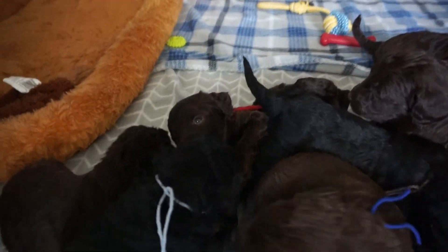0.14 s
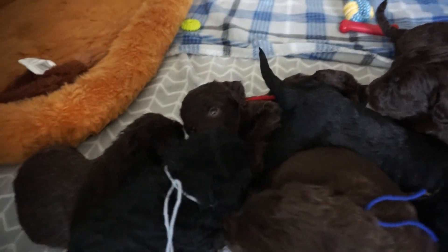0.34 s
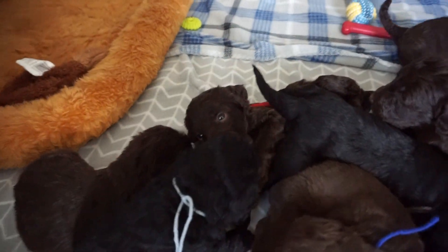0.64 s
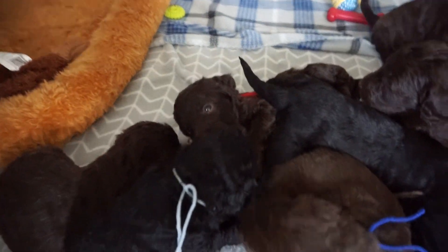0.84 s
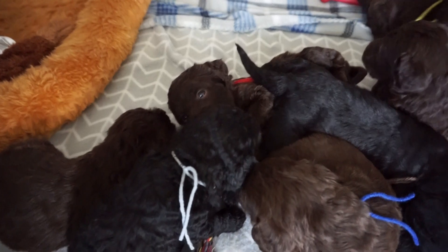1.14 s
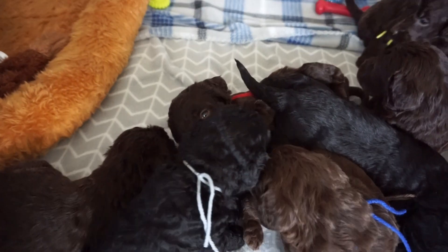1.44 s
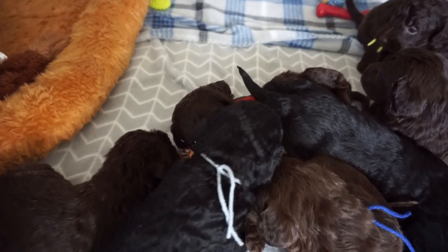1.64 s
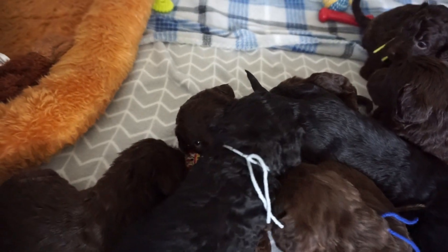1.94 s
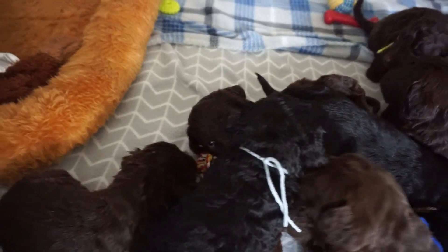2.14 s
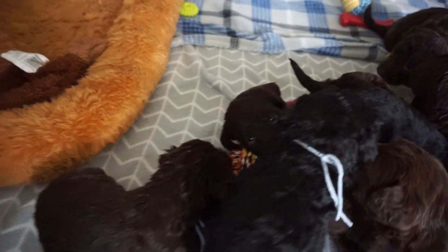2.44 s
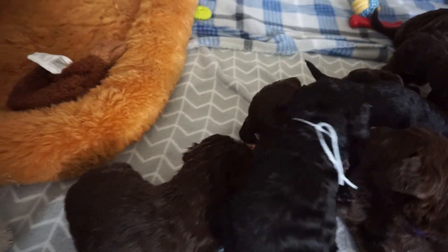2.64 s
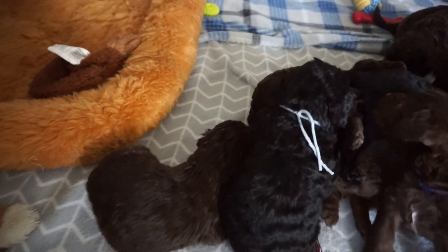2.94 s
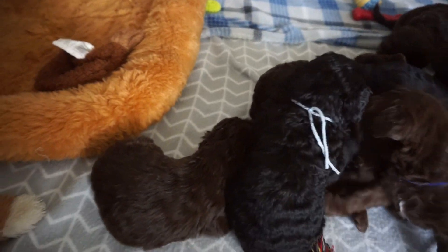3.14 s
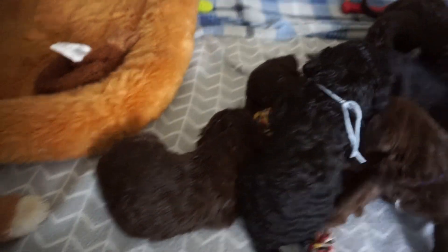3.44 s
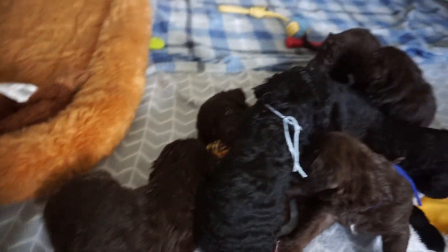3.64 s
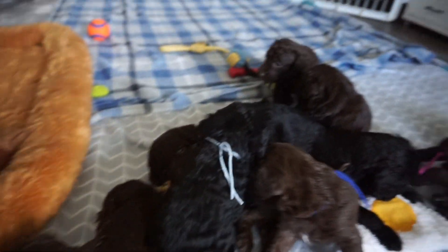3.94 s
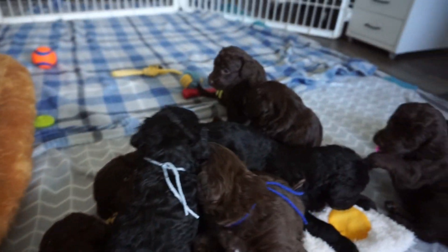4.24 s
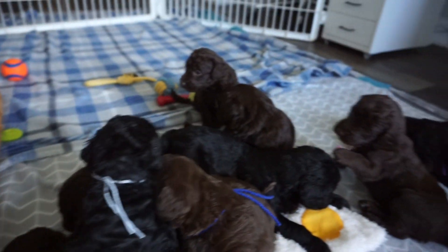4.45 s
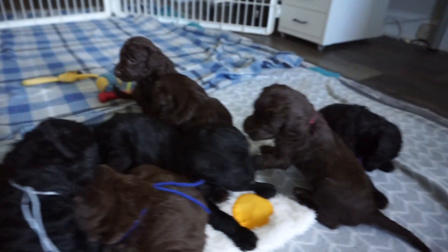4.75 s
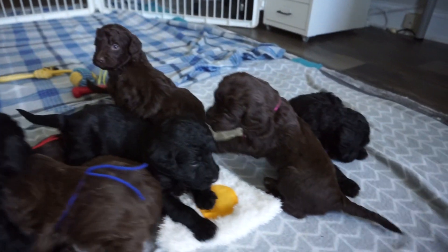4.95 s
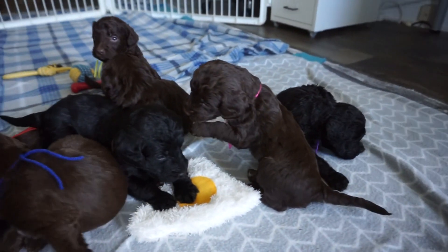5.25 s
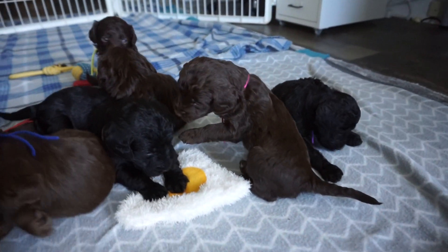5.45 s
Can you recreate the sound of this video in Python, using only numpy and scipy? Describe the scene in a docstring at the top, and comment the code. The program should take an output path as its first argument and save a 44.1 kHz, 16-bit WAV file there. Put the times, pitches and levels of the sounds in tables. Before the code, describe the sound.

Close stereo sound of puppies scrambling on blankets over a crinkly liner in a small room. From 0 to 0.6 s, sharp, bright crackles come thick and fast, right of centre, with dragging rustle, soft paw pats and low, padded body thumps around 0.3-0.4 s; a tiny falling squeak chirps near 0.15 s. It then thins to isolated dull ticks, with a small snap cluster at 1.4 s and a fainter, rough squeak at 1.5 s. Around 2.2-2.6 s another crackly flurry rises and falls. From 3 to 3.7 s there are lighter ticks, crackles and pats, then near quiet. At 4.6 s the crackling resumes, growing loudest and densest around 4.8-5.2 s with firmer pats, moving slightly left, and easing off after a sharp snap at 5.4 s. A short room echo, soft hiss, gently swelling low rumble and barely audible mains hum stay beneath.

```python
"""Sharp crackles and a rustle come first: puppies wrestle on blankets in an indoor pen, close to the microphone.
A crinkly liner under the blankets snaps as its creases buckle; each shove drags a rustle of finer crackle
along and sets off small creases by chance, more the harder it pushes. Buried creases tick dully,
slipping surfaces squeak briefly, and paws and bodies pat and thump as damped rings of the padded floor.
A small room answers with a short tail, over a soft hiss, a swelling rumble and a faint mains hum."""
import sys
import numpy as np
from scipy import signal
from scipy.fft import rfft, irfft
from scipy.io import wavfile
from scipy.ndimage import uniform_filter1d, map_coordinates

SR = 44100
rng = np.random.default_rng(int(sys.argv[2]) if len(sys.argv) > 2 else 0)


def dump_mix(stems):
    """Bounce the given channels to the path in sys.argv[1] as a 16-bit WAV at rate SR."""
    frames = np.atleast_2d(stems).T  # one column per channel
    limited = np.clip(frames, -1, 1)  # hard clip at full scale
    pcm = np.round(limited * 32767).astype(np.int16)
    wavfile.write(sys.argv[1], SR, pcm)


N = 246959

# The loudest creases that buckle, each level taken over 1 ms: start_s, body_db, edge_db
SNAPS = [(0.0356, -28, -28), (0.058, -28.5, -22), (0.0659, -32, -32), (0.0733, -47, -27),
         (0.0805, -30, -24), (0.088, -34, -30), (0.1144, -25, -34), (0.1232, -28, -27), (0.2183, -35, -40),
         (0.2295, -23.5, -26.5), (0.2407, -43, -35), (0.2538, -22, -21), (0.256, -24, -25),
         (0.2605, -38, -38), (0.2858, -25, -19.5), (0.2952, -31, -34), (0.3051, -22.5, -26),
         (0.3202, -36, -19.5), (0.329, -35, -34), (0.3553, -32, -32), (0.3748, -33, -23),
         (0.378, -25.5, -20), (0.3826, -40, -24), (0.422, -24.5, -28), (0.4312, -28, -22),
         (0.4377, -25, -26), (0.4418, -39, -22), (0.4632, -24, -26), (0.4805, -26, -36), (0.4878, -37, -31),
         (0.4922, -44, -32), (0.5057, -32.5, -25), (0.5602, -50, -38), (0.5725, -32.5, -28.5),
         (0.7364, -44, -39.5), (0.8065, -49, -42), (1.2643, -45, -50), (1.2949, -37.5, -37.5),
         (1.403, -23, -33.5), (1.4081, -36, -35), (1.446, -28, -33), (1.9068, -45.5, -45),
         (1.9761, -42, -44), (2.1717, -29, -32), (2.1882, -26, -20.5), (2.221, -41, -37),
         (2.2586, -37, -35), (2.2711, -31.5, -47), (2.2792, -33, -31.5), (2.2902, -41, -36),
         (2.2985, -30, -36), (2.3032, -34, -37), (2.3056, -28, -36), (2.3098, -34, -40), (2.313, -35, -23),
         (2.3546, -40, -44), (2.3776, -42, -32), (2.3851, -30, -32.5), (2.4136, -39, -37),
         (2.4191, -42, -40), (2.44, -58, -37), (2.4676, -57, -33.5), (2.4937, -42, -32),
         (2.5069, -33.5, -30), (2.5156, -23.5, -23), (2.5332, -25, -39), (2.5371, -27.5, -27),
         (2.5503, -35, -26), (2.5829, -25, -17.5), (2.8704, -32, -36), (3.012, -35.5, -31),
         (3.0379, -30, -43), (3.2413, -40, -38.5), (3.2453, -37.5, -35.5), (3.2857, -57, -32.5),
         (3.3043, -35, -32.5), (3.3412, -49, -39), (3.3575, -36, -37), (3.3755, -30.5, -28),
         (3.5148, -34.5, -40.5), (3.5286, -44, -40), (3.5615, -33.5, -50), (3.5652, -28, -50),
         (3.5727, -33.5, -50), (3.681, -43, -40), (4.584, -31, -33.5), (4.6616, -36, -36),
         (4.697, -26.5, -31), (4.7185, -28, -27), (4.7379, -28.5, -31), (4.7453, -23, -25),
         (4.7627, -38, -29), (4.7726, -22, -23), (4.7907, -24.5, -33), (4.8045, -23.5, -32),
         (4.8154, -34, -34), (4.826, -45, -39), (4.8424, -27, -18.5), (4.8738, -24.5, -17),
         (4.8772, -18.5, -23), (4.9085, -33, -26), (4.922, -20, -24), (4.9303, -29, -18), (4.933, -18, -21),
         (4.9587, -26, -15.5), (4.967, -26, -17.5), (4.9946, -18.5, -22), (4.9976, -28, -24),
         (5.0041, -37, -18), (5.0161, -27, -24), (5.0325, -41, -24), (5.0557, -27, -36),
         (5.0602, -29, -24.5), (5.0764, -37, -34), (5.0827, -29, -32), (5.1157, -27.5, -12.5),
         (5.1235, -16, -32), (5.1317, -29, -24), (5.1743, -35, -38), (5.1817, -34, -24.5),
         (5.2019, -23, -25.5), (5.2153, -27, -24), (5.2207, -35, -39), (5.244, -23.5, -23),
         (5.2481, -27, -23.5), (5.2754, -40, -35), (5.2795, -25.5, -26), (5.29, -33, -28),
         (5.3156, -35, -28), (5.3264, -26, -28), (5.3419, -22.5, -28), (5.3468, -33, -26),
         (5.3515, -43, -33), (5.3743, -48, -38), (5.4106, -25.5, -37), (5.4129, -27, -20.5),
         (5.4194, -22.5, -13.5), (5.5309, -31.5, -24)]
# Spectrum of a snap's crisp edge: freq_hz, relative_db
EDGE = [(300, -28), (1000, -12.5), (3000, -13), (6000, -3), (8500, 3.5), (11000, 5.5), (14000, 6),
        (16000, 0.5)]
# Pitch of the patch of sheet under the paws: time_s, pitch_hz
SHEET_HZ = [(0.4, 4100), (2.5, 3610), (4.9, 3350)]
SHEET_OCTAVES = 0.12  # random scatter of each crease round that pitch


def snaps(creases, cycles=0.71, burst_s=0.00019, large_db=-17, build_s=0.0001,
          lead_in_db=-22, lead_in_s=0.003, settle_db=-21, settle_s=0.0035, lumpy_db=6, rattle=0.63,
          muffle=1.92, likeness=0.63, wander_db=2.5, far_body_db=1, far_edge_db=-1):
    """A crease gives way in a brief burst of slips and settles; the slips ring the sheet around it.
    Returns the direct sound, and the smoother sum over all directions that goes out into the room."""
    lead = 128  # samples of faint lead-in before the snap
    near, far = np.zeros((2, N)), np.zeros((2, N))
    t = np.arange(768) / SR
    before, after = np.maximum(lead / SR - t, 0), np.maximum(t - lead / SR, 0)
    plain_edge = per_ms(colour((t == 0)[None] * 1., EDGE))

    for s, body_db, edge_db in creases:
        hz = np.interp(s, *np.transpose(SHEET_HZ)) * 2 ** (SHEET_OCTAVES * rng.standard_normal())
        size = 1 + amp(edge_db - large_db)  # large creases take longer to buckle
        length = burst_s * size * np.exp(0.35 * rng.standard_normal())

        lead_in = amp(lead_in_db) * np.exp(-before / lead_in_s)
        settle = amp(settle_db) * np.exp(-after / settle_s)
        faint = np.where(before > 0, lead_in, settle)
        # neighbouring creases give way in small jerks
        jerks = unit(amp(lumpy_db * unit(uniform_filter1d(rng.standard_normal(len(t)), size=24))))
        shape = np.exp(-before / build_s - after / length) + faint * jerks

        edge = per_ms(colour(stereo_noise(len(t), likeness) * shape, EDGE))
        push = rattle * stereo_noise(len(t), likeness) * shape
        push[:, lead] += 1  # the main slip
        low_pass = signal.butter(2, min(hz * muffle, SR / 3), fs=SR)
        sheet = signal.lfilter(*low_pass, np.diff(ring(t, hz, cycles), prepend=0))[None]
        body = per_ms(bounced(signal.fftconvolve(push, sheet, axes=1)[:, :len(t)]))

        side = sides(pan_at(s) + wander_db * rng.standard_normal())
        direct = amp(body_db) * body + amp(edge_db) * edge
        outward = amp(body_db + far_body_db) * per_ms(sheet) + amp(edge_db + far_edge_db) * plain_edge
        add(near, s - lead / SR, direct * side)
        add(far, s, outward * side)
    return near, far


def small_creases(rub, body_db=-0.5, edge_db=6.5, idle_db=-64, crowding=0.7, largest_db=-34, count=150):
    """Lesser creases give way by chance, more often and louder the harder the rubbing."""
    drive = rub + amp(idle_db)
    strain = np.cumsum(drive ** crowding)
    # one crease in each equal share of the total strain
    at = np.searchsorted(strain, strain[-1] * (np.arange(count) + rng.random(count)) / count)
    db = np.minimum(20 * np.log10(drive[at]), largest_db)
    return list(zip(at / SR, db + body_db, db + edge_db))


# Dull ticks muffled by the blankets, level over 1 ms with the floor bounce included: start_s, level_db, pitch_hz
TICKS = [(0.1587, -30, 3300), (0.1802, -39, 3100), (0.684, -35, 3000), (0.8776, -44, 2460),
         (0.9427, -40.5, 1980), (1.0013, -45, 2140), (1.0524, -39, 3080), (1.5686, -46, 1510),
         (1.602, -46, 3060), (1.6445, -36.5, 2300), (2.15, -38.5, 3420), (2.755, -37.5, 3420),
         (2.7669, -42, 2600), (2.998, -39.5, 3540), (3.005, -37.5, 2270), (3.04, -29, 2260),
         (3.1182, -38.5, 2900), (3.1986, -45.5, 3500), (3.3755, -38, 2200), (3.3917, -42, 1500),
         (3.4582, -38, 3460), (3.5386, -39, 1680), (3.603, -33.5, 3740), (3.6466, -41, 3180),
         (3.7592, -44, 3000), (3.829, -40, 1710), (4.274, -47, 3440), (4.5123, -36, 2600),
         (4.5877, -34.5, 3100), (4.7591, -27, 3420), (4.974, -19, 2620), (5.2327, -38, 3200),
         (5.416, -28, 2220), (5.4214, -26, 2420), (5.5037, -37.5, 3460)]


def buried_creases(cycles=0.8, muffle=2.08):
    """Under the blankets a snap loses its crisp edge and is only a short, dull tap."""
    out = np.zeros((2, N))
    t = np.arange(512) / SR
    for s, db, hz in TICKS:
        low_pass = signal.butter(4, hz * muffle, fs=SR)
        tap = signal.lfilter(*low_pass, np.diff(ring(t, hz, cycles), prepend=0))
        add(out, s, place(amp(db) * per_ms(bounced(tap[None])), s))
    return out


BOUNCE_DB, BOUNCE_S = -9, 0.001097  # the floor's reflection: level, average delay


def bounced(click):
    """The floor throws a click back a moment later, after a delay drawn afresh for each click."""
    lag = int(BOUNCE_S * (rng.random() + .5) * SR)
    reflection = np.pad(click, ((0, 0), (lag, 0)))[:, :click.shape[1]]
    return click + amp(BOUNCE_DB) * reflection


# Shoves that drag the bedding along, levels relative: start_s, length_s, level_db
SHOVES = [(0.0, .2, -50), (0.025, .075, -41.5), (0.199, .06, -45), (0.248, .135, -37), (0.277, .055, -31),
          (0.407, .09, -38.5), (0.53, .09, -53.5), (1.409, .03, -45.5), (1.439, .06, -52),
          (1.498, .11, -57.5), (2.175, .07, -46.5), (2.242, .195, -46.5), (2.281, .04, -38.5),
          (2.515, .03, -38.5), (2.686, .09, -53.5), (2.963, .15, -52.5), (3.025, .03, -41),
          (3.111, .12, -57), (3.266, .14, -55), (3.42, .07, -55.5), (3.527, .06, -44), (3.656, .13, -56.5),
          (4.509, .17, -57), (4.703, .05, -42.5), (4.749, .085, -31), (4.858, .28, -36), (4.901, .028, -31),
          (4.945, .058, -29.5), (5.121, .018, -34), (5.187, .115, -41), (5.33, .022, -38),
          (5.401, .016, -34)]
# a shove builds, holds and lets go; then the cloth settles faintly
ATTACK_S, RELEASE_S, SETTLE_DB, SETTLE_S = 0.02, 0.012, -25, 0.08


def effort():
    """How hard the bedding is rubbed at every sample, as a gain; overlapping shoves add in power."""
    t = np.arange(0, N, 32) / SR  # a coarse grid is enough
    start, length, db = np.transpose(SHOVES)[:, :, None]
    since = np.maximum(t - start - length, 0)
    fall = np.maximum(np.exp(-since / RELEASE_S), amp(SETTLE_DB) * np.exp(-since / SETTLE_S))
    gain = amp(db) * np.clip((t - start) / ATTACK_S, 0, 1) * fall
    return np.interp(np.arange(N) / SR, t, np.linalg.norm(gain + 1e-9, axis=0))


def catching(depth_db=4, rate_hz=170):
    """Sliding cloth catches and slips, so its crackle comes in clumps with gaps: a gain for every sample."""
    slow = np.fft.rfftfreq(N, 1 / SR) < rate_hz
    chance = unit(irfft(rfft(rng.standard_normal(N)) * slow, N))
    return unit(amp(depth_db * np.clip(chance, -2, 2)))


# Spectrum of the fine crackle: freq_hz, relative_db
CRACKLE = [(120, -26.5), (300, -8), (700, -2), (1400, -2.5), (2500, 7), (4200, 6.5), (6500, 0), (9000, 1.5),
           (12000, 2.5), (16000, -7)]


def rustle(rub, level_db=-2.0, per_s=520, spread_db=5, fibre_db=-18, tone_db=0, patchy_db=4,
           likeness=0.84, count=24):
    """Rubbing sets off a swarm of tiny, sharp crackles of varied colour over the faint hiss of fibres."""
    grains = np.zeros((2, N))
    t = np.arange(128) / SR
    happens = rng.random(N) < per_s / SR
    sizes = amp(spread_db * np.minimum(rng.exponential(1, N), 3.0)) * happens
    kinds = rng.integers(0, count, N)
    for k in range(count):
        tick = stereo_noise(len(t), likeness) * np.exp(-t / 0.00018)
        tone = ring(t, 1500 * 9 ** ((k + rng.random()) / count), 1.7)  # 1.5 to 13.5 kHz
        tone_gain = amp(tone_db + patchy_db * rng.standard_normal())
        grain = unit(unit(tick) + tone_gain * unit(tone))
        grains += signal.oaconvolve((sizes * (kinds == k))[None], grain, axes=1)[:, :N]
    fibres = stereo_noise(N, likeness)
    sound = unit(colour(unit(grains) + amp(fibre_db) * fibres, CRACKLE, size=2048))
    return sound * rub * amp(level_db) * sides(curve(PLACE))


# Surfaces that stick and slip: start_s, level_db (of the fundamental), first_hz, last_hz, length_s
SQUEAKS = [(0.151, -34, 3140, 2780, 0.0097), (1.504, -47, 2720, 1610, 0.0086)]


def squeaks(overtone_db=-8, jitter=0.049):
    """Stick and slip: a short, rough, falling tone with its octave."""
    out = np.zeros((2, N))
    t = np.arange(1024) / SR
    for s, db, first_hz, last_hz, length in SQUEAKS:
        wobble = unit(uniform_filter1d(rng.standard_normal(len(t)), size=12))
        hz = np.interp(t, [0, length], [first_hz, last_hz]) * (1 + jitter * wobble)
        angle = 2 * np.pi * np.cumsum(hz) / SR
        # after its length a faint remainder holds on to the end of t
        swell = np.interp(t / length, [0, .1, .8, 1], [0, 0.96, 1.0, 0.12])
        tone = np.sqrt(2) * swell * (np.sin(angle) + amp(overtone_db) * np.sin(2 * angle))
        add(out, s, place(amp(db) * tone, s))
    return out


# Paws on the padding, levels relative to one another: start_s, level_db, pitch_hz
PATS = [(0.0585, -41.5, 580), (0.2525, -40.5, 1190), (0.2855, -43, 570), (0.4195, -43, 440),
        (0.5105, -45.5, 695), (1.4465, -44, 596), (1.5675, -48, 910), (2.1725, -46.5, 800),
        (2.2785, -43, 855), (2.3535, -43.5, 925), (2.5485, -42, 660), (2.7665, -43.5, 744),
        (3.0045, -47, 650), (3.0395, -43.5, 790), (3.3745, -39.5, 650), (3.3925, -42, 960),
        (3.5365, -42.5, 850), (4.8735, -37.5, 880), (4.9955, -34.5, 930), (5.1035, -43.5, 726),
        (5.2025, -36.5, 654), (5.4135, -41, 553)]


def pats():
    """A paw rings the padding for about one cycle, with an equally strong, very short scuff."""
    return blows(PATS, level_db=6, cycles=1.0, scuff_db=0, scuff_s=0.0021, reach=2.17)


# Bodies that land on the floor, levels relative to one another: start_s, level_db, pitch_hz
THUMPS = [(0.3155, -38.5, 248), (0.419, -39, 277), (2.551, -54, 231)]


def thumps():
    """A landing body rings the floor lower, with a longer, softer scuff."""
    return blows(THUMPS, level_db=7.0, cycles=1.3, scuff_db=-3.0, scuff_s=0.034, reach=1.7)


def blows(rows, level_db, cycles, scuff_db, scuff_s, reach):
    """A soft blow: a quickly damped ring of the padded floor, and a short, dull scuff."""
    out = np.zeros((2, N))
    t = np.arange(4096) / SR
    for s, db, hz in rows:
        knock = signal.lfilter(*signal.butter(2, hz / 2, "high", fs=SR), ring(t, hz, cycles))
        scuff = stereo_noise(len(t), 0.83) * np.exp(-t / scuff_s)
        scuff = signal.lfilter(*signal.butter(2, [hz / 2, hz * reach], "band", fs=SR), scuff)
        sound = per_ms(unit(knock) + amp(scuff_db) * unit(scuff))
        add(out, s, amp(db + level_db) * sound * sides(-2.8))
    return out


# Where the scuffle is, positive to the left: time_s, left_minus_right_db
PLACE = [(0, -8.5), (0.4, -6), (1.4, -7.5), (3.6, -8), (4.6, -4.5), (4.9, -1), (5.1, 3), (5.5, 4)]


def pan_at(s):
    """Left-right dB of the scuffle at time s."""
    return np.interp(s, *np.transpose(PLACE))


def place(x, s):
    """Puts a sound where the scuffle is at time s."""
    return x * sides(pan_at(s))


def aside(full_db=4):
    """How far the scuffle is off to the right at every sample, 0-1."""
    return np.clip(-curve(PLACE) / full_db - .6, 0, 1)


# Colour of both microphone ports for sound from the right: freq_hz, gain_db
FROM_RIGHT = [(2500, -0.5), (4200, -1.5), (6300, -2.5), (10000, -4), (11700, 0), (15500, 5.5)]


def ports(x, full_lag=4):
    """With the scuffle off to the right, the treble colour shifts and the left port hears it samples late."""
    right = aside()
    x = (1 - right) * x + right * colour(x, FROM_RIGHT)
    late = map_coordinates(x[0], [np.arange(N) - full_lag * right], order=5)
    return np.array([late, x[1]])


# Decay of the room's answer: freq_hz, t60_s
ROOM_T60 = [(200, .3), (1000, .34), (3000, .35), (8000, .29), (15000, .23)]
# Colour of the room's answer: freq_hz, gain_db
ROOM_COLOUR = [(200, 2.5), (1000, 3.5), (1700, 3), (2350, 1), (3000, 0), (4500, -2), (6500, 0), (9000, -3),
               (15000, -2.5)]


def room(x, wet_db=-7, first_s=0.0027, likeness=0.17, cross=0.25, count=3, turn_s=.21):
    """Scattered reflections die away, the top treble fastest; several echo patterns take turns."""
    size = int(.6 * SR)
    out = np.zeros((2, N))
    feed = 0.63 * x + cross * x[::-1]  # the walls mix the two sides
    for k in range(count):
        scatter = rng.standard_normal((3, size)) * (rng.random((3, size)) < .15)
        hz, t, z = signal.stft(pair(*scatter, likeness), SR, nperseg=256)
        z = z * amp(-60 * t / spectrum_at(ROOM_T60, hz)[:, None])
        # silent up to first_s, then fading in over as long again
        onset = np.clip(np.arange(size) / SR / first_s - 1, 0, 1)
        tail = signal.istft(z, SR, nperseg=256)[1][:, :size] * onset
        tail = colour(tail / np.linalg.norm(tail[0]), ROOM_COLOUR)
        # the squared shares always add up to one
        share = np.sqrt(2 / count) * np.cos(np.pi * (np.arange(N) / SR / turn_s + k / count))
        out += signal.fftconvolve(feed * share, tail, axes=1)[:, :N]
    return amp(wet_db) * out


# Left port's own colour: freq_hz, gain_db
LEFT_PORT = [(800, -1), (2100, -3.5), (3300, -5.5), (5600, 1.5), (9500, -0.5), (13000, -2)]


def left_port(x):
    """The left port colours all it hears of the scuffle and the room's answer."""
    return np.array([colour(x[:1], LEFT_PORT)[0], x[1]])


# Spectrum of the still room: freq_hz, relative_db
AIR = [(15, -23), (25, -4.5), (64, -7), (86, -3.5), (119, -4.5), (148, 0), (297, -6), (410, -6),
       (537, -3.5), (1110, -11), (2230, -13.5), (6550, -18.5), (15500, -18.5)]
# Left-right likeness of the still room: freq_hz, likeness (below 0 counts as 0)
AIR_LIKENESS = [(60, 0.93), (180, 0.74), (550, 0.03), (1650, -0.25), (4970, -0.13), (15000, -0.0)]
# Swell of the low rumble: time_s, gain_db
RUMBLE = [(0, 3), (2.3, -0.5), (3.4, 2), (5.1, 3.5), (5.5, 7.5)]
# Mains hum, levels relative to each other: pitch_hz, level_db
HUM = [(59.6, -68.5), (119.4, -65.5)]


def still_room(air_db=-55.37, hum_db=-2, waver=0.47, pan_db=-1, swell_db=1.5, rumble_hz=250):
    """Steady hiss, a rumble that swells and sinks, and a faint wavering mains hum."""
    hz, t = np.fft.rfftfreq(N, 1 / SR), np.arange(N) / SR

    def drift():
        """Slow chance, below 4 Hz."""
        return unit(irfft(rfft(rng.standard_normal(N)) * (hz < 4), N))

    z = pair(*rfft(rng.standard_normal((3, N))), spectrum_at(AIR_LIKENESS, hz))
    z = z * amp(spectrum_at(AIR, hz))
    low = 1 / (1 + (hz / rumble_hz) ** 2)
    hiss = irfft(z * (1 - low), N)
    rumble = irfft(z * low, N) * amp(curve(RUMBLE) + swell_db * drift())
    air = unit(hiss + rumble) * amp(air_db)

    hum = np.zeros(N)
    for f, db in HUM:
        tone = np.sqrt(2) * np.sin(2 * np.pi * (f * t + rng.random()))
        hum += amp(db + hum_db) * (1 + waver * drift()) * tone
    return air * sides(pan_db) + hum


def amp(db):
    """Decibels to gain."""
    return 10 ** (np.asarray(db) / 20)


def unit(x):
    """Scales to an rms of 1."""
    return x / np.sqrt(np.mean(x ** 2) + 1e-20)


def per_ms(x):
    """Scales each channel of a click to the energy of one millisecond at an rms of 1."""
    return x * np.sqrt(SR / 1000 / np.sum(x ** 2, -1, keepdims=True))


def spectrum_at(points, hz):
    """Reads (Hz, value) rows on a log-frequency axis."""
    f, value = np.transpose(points)
    return np.interp(np.log(hz + 1), np.log(f + 1), value)


def curve(points):
    """Reads (s, value) rows at every sample."""
    return np.interp(np.arange(N) / SR, *np.transpose(points))


def add(mix, s, sound):
    """Mixes a stereo sound in at time s."""
    part = mix[:, max(round(s * SR), 0):][:, :sound.shape[1]]
    part += sound[:, :part.shape[1]]


def colour(x, points, size=512):
    """Causal (minimum-phase) filter with the given spectrum, so that attacks stay sharp."""
    log_gain = np.log(amp(spectrum_at(points, abs(np.fft.fftfreq(size, 1 / SR)))))
    taps = np.fft.ifft(np.exp(np.conj(signal.hilbert(log_gain)))).real
    return signal.fftconvolve(x, taps[None, :size // 2], axes=1)[:, :x.shape[1]]


def pair(a, b, c, likeness):
    """Left and right from a shared part and two separate parts."""
    share = np.clip(likeness, 0, 1)
    return np.sqrt(share) * a + np.sqrt(1 - share) * np.array([b, c])


def stereo_noise(size, likeness):
    """White noise whose left and right are alike to the given degree."""
    return pair(*rng.standard_normal((3, size)), likeness)


def sides(pan_db):
    """Left and right gains of constant total power; positive leans left."""
    g = amp(np.array([pan_db, -pan_db]) / 2).reshape(2, -1)
    return g / np.sqrt(np.mean(g ** 2, 0))


def ring(t, hz, cycles):
    """A damped oscillation that falls to 1/e in the given number of cycles."""
    return np.sin(2 * np.pi * hz * t) * np.exp(-t * hz / cycles)


def scene(squeak_echo_db=-7, tick_echo_db=-1, rustle_echo_db=-1):
    """The scuffle, its echo and the still room; the squeaks send less into the room."""
    rub = effort()
    loud, loud_far = snaps(SNAPS)
    small, small_far = snaps(small_creases(rub), cycles=0.37, burst_s=0.00059, wander_db=14,
                             far_body_db=5.0, far_edge_db=4.5)
    dull = buried_creases()
    cloth = rustle(rub * catching())
    squeak = squeaks()
    floor = pats() + thumps()

    direct = loud + small + dull + cloth + squeak + floor
    outward = loud_far + small_far + floor
    outward += amp(tick_echo_db) * dull + amp(rustle_echo_db) * cloth + amp(squeak_echo_db) * squeak
    return left_port(ports(direct) + room(outward)) + still_room()


CUTOFF_HZ = 15950


def record(dry):
    """The recorder's band limit: a steep low-pass."""
    low_pass = signal.firwin(255, CUTOFF_HZ, window=("kaiser", 8), fs=SR)
    return signal.oaconvolve(dry, low_pass[None], "same")


dry = scene()
out = record(dry)
dump_mix(out)
```